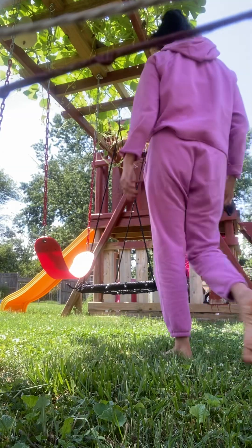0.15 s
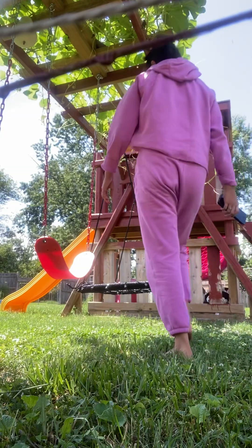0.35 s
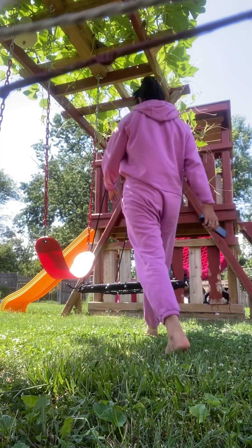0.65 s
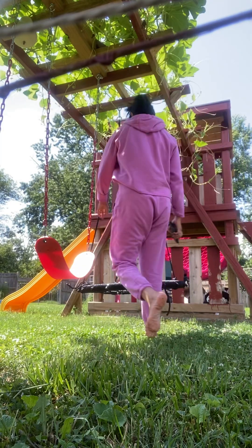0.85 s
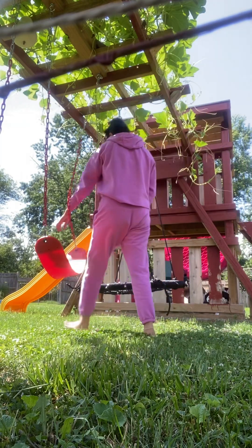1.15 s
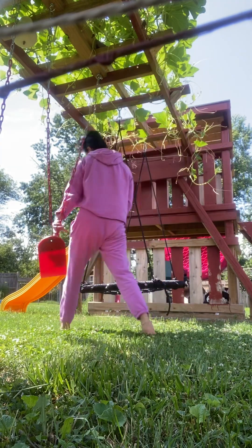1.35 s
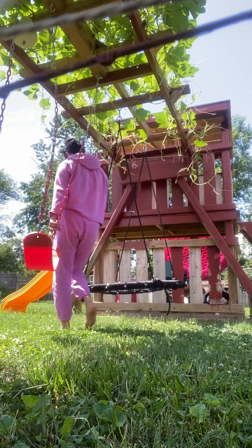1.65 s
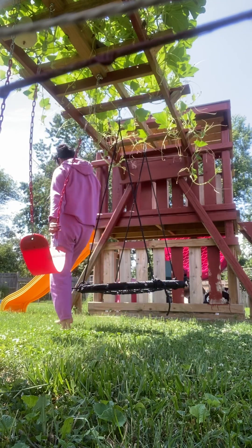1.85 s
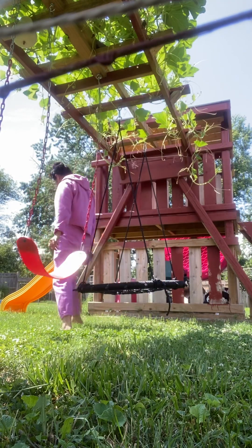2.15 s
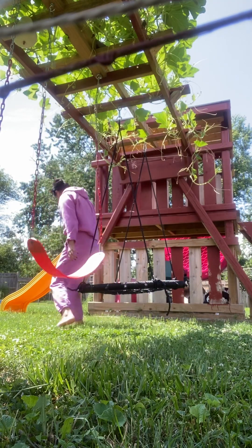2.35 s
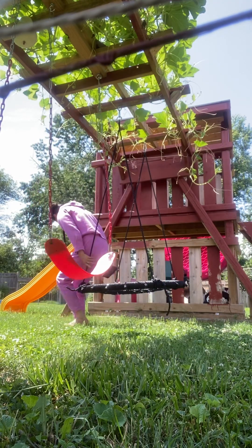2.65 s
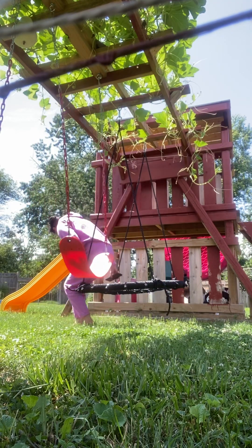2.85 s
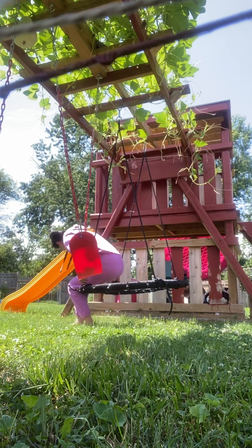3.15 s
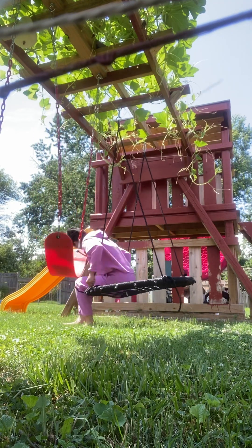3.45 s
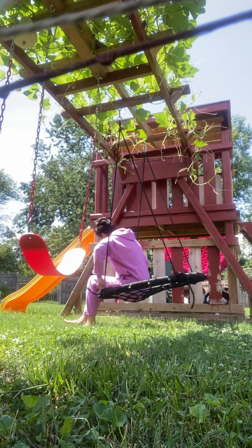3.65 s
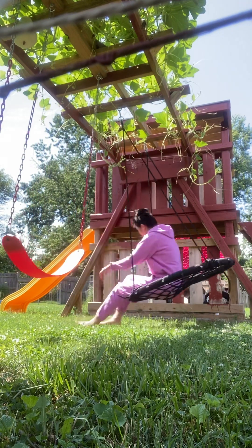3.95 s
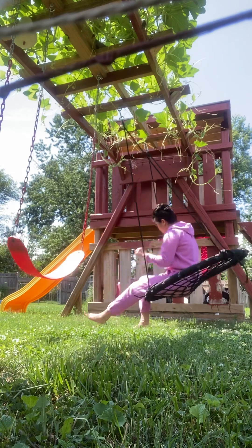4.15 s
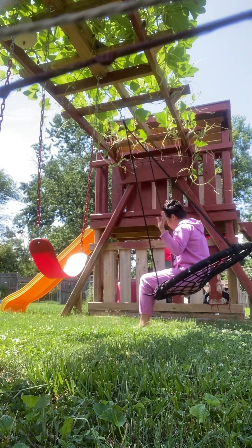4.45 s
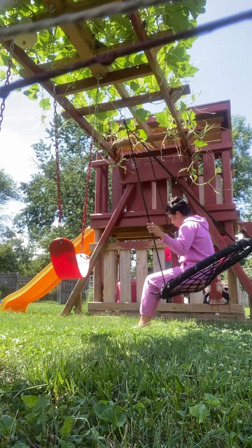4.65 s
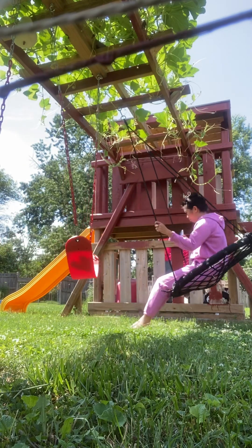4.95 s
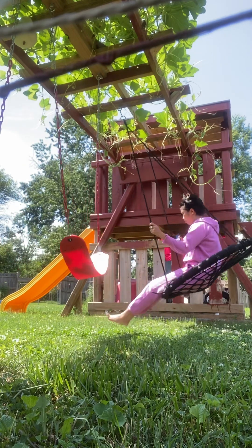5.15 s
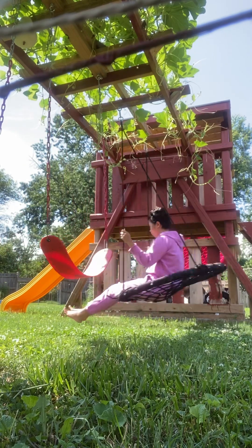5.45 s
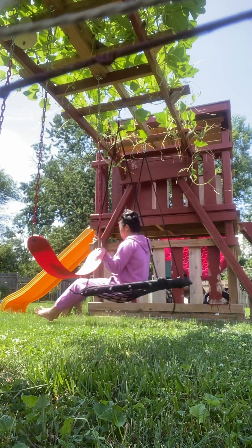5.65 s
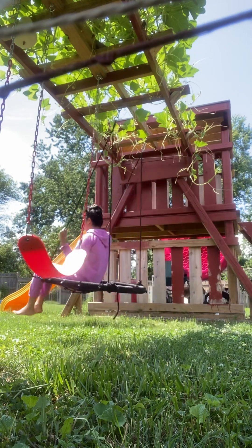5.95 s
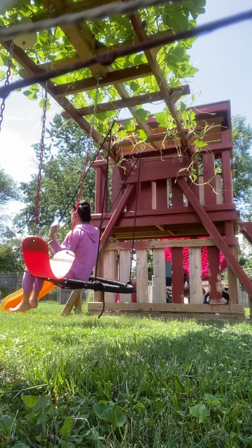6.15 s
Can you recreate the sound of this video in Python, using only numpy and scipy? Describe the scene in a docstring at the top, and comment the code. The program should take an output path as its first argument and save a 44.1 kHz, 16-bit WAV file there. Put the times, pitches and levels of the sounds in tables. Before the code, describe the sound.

In a backyard, swing chains tick and jingle against hollow wood, followed by sharp clacks and short grinding creaks as someone sits and swings.

```python
"""Backyard swing set

A timber swing set, heard in stereo from a camera resting on a neighbouring swing. Distant rumble and a swelling
hiss of insects are filtered noise. Steel chains, struck as damped modes, clink and bump the dull, boomy frame as
someone brushes past one swing and sits down on another; then the loaded hangers clack and grind, as slips excite
resonances.
"""
import sys
import numpy as np
from scipy import signal
from scipy.fft import rfft, irfft, next_fast_len
from scipy.io import wavfile
from scipy.ndimage import map_coordinates

SR = 44100
rng = np.random.default_rng(int(sys.argv[2]) if len(sys.argv) > 2 else 0)


def transcribe(u):
    """Save the signal u as a 16-bit wav file named by the first command-line argument.

    u: samples, shape (n,) or (channels, n), limited to [-1, 1]; the rate is SR.
    q: integer samples, one column per channel.
    """
    v = np.clip(np.atleast_2d(u).T, -1, 1)
    q = np.round(v * 32767).astype(np.int16)
    wavfile.write(sys.argv[1], SR, q)


N = 278226
T = np.arange(N) / SR

# Rumble across the yard. Each row: frequency in Hz, relative density in dB per Hz.
YARD_SPECTRUM = [(20, -10), (35, -6), (55, 4), (80, -4.5), (115, 0), (200, -11.5), (420, -19), (750, -25.5),
                 (1100, -28.5), (2200, -36.5), (3000, -40), (6300, -42.5), (8200, -53), (10000, -42.5),
                 (13000, -66)]
# Insects. Each row: frequency in Hz, relative density in dB per Hz.
INSECT_SPECTRUM = [(1500, -96), (2600, -8.5), (3500, -3.5), (4500, -6), (5100, 3), (6400, 5), (6900, 1),
                   (7500, -10.5), (9000, -18), (12000, -59)]
# Left-right likeness of the hisses. Each row: frequency in Hz, correlation from 0 to 1.
STEREO_LIKENESS = [(60, .999), (300, 1), (650, 0.76), (1000, 0.033), (2200, 0.43), (3400, 0.97),
                   (4100, 0.4), (5500, 1), (6800, 0.97), (10000, 1)]
# Chains jostling the seat. Each row: time in seconds, relative level in dB.
SWAY = [(0.8, -51), (1.17, -37.5), (1.57, -33.5), (1.81, -23.5), (1.98, -30), (3.17, -36), (3.34, -59),
        (3.6, -39)]
# Modes of the frame and seat. Each row: frequency in Hz, relative level in dB, T60 in seconds.
FRAME_MODES = [(52.2, -11, 0.58), (71, 1, 0.11), (112.4, -0.5, 0.19), (157.1, 1.5, 0.15),
               (227.4, -3, 0.099), (300.8, 0, 0.15), (324.5, -3.5, 0.15), (464, -27, 0.088),
               (590, -18, 0.045)]
# Bumps against the frame. Each row: time in seconds, relative level in dB, hardness in dB per octave.
FRAME_BUMPS = [(0.977, -24.5, -1.5), (1.127, -13, 1.5), (1.247, -24.5, -7.5), (1.316, -23.5, -1),
               (1.362, -22, -10), (1.512, -21, -8.5), (1.663, -16, -0.5), (1.774, -24.5, 14.5),
               (1.921, -30, -6), (1.964, -19, 1), (2.192, -21, -5), (2.246, -20.5, -5), (2.296, -22, 2.5),
               (2.602, -32, 17.5), (2.689, -35, 12.5), (2.756, -31.5, 14), (2.967, -23, -1),
               (3.106, -21, 4), (3.153, -22.5, 13.5), (3.614, -24.5, -6.5), (3.683, -30.5, -18),
               (3.736, -28, 5), (4.168, -31.5, 12.5), (4.256, -14.5, 0.5), (4.419, -33, 12.5),
               (4.361, -26, -12.5), (4.498, -23.5, 0.5), (4.636, -19.5, -9.5), (4.66, -23, -5),
               (4.799, -21, -2.5), (4.879, -19.5, -6), (4.922, -20, -1.5), (5.573, -16, -8),
               (5.601, -16, -7), (5.733, -16, 4), (5.941, -10.5, 3), (5.967, -16.5, -13.5),
               (6.269, -21.5, 0.5)]
# Chain links striking. Each row: time in seconds, relative level in dB, kind of link ("long" or "short").
LINK_STRIKES = [(1.077, -47.5, "long"), (1.32, -49, "long"), (1.555, -52, "long"), (1.617, -27.5, "long"),
                (1.624, -37, "long"), (1.646, -35.5, "long"), (1.659, -41, "long"),
                (1.7637, -29.5, "short"), (1.78, -39.5, "short"), (1.819, -43, "long"),
                (1.908, -40, "short"), (2.045, -47.5, "long"), (2.132, -50, "long"), (2.152, -34, "long"),
                (2.232, -34, "short"), (2.244, -41, "long"), (2.263, -37, "long"), (2.277, -45, "short"),
                (2.286, -41, "long"), (2.38, -38.5, "long"), (2.395, -42, "long"), (2.46, -53, "long"),
                (2.494, -51, "long"), (2.597, -37.5, "short"), (2.636, -59, "short"),
                (2.716, -39.5, "short"), (2.727, -37, "short"), (2.746, -33, "short"),
                (2.972, -49, "short"), (3.095, -46, "long"), (3.112, -40, "long"), (3.148, -35, "short"),
                (3.23, -39.5, "long"), (3.24, -36.5, "long"), (3.339, -43.5, "long"), (3.557, -45, "short"),
                (3.611, -34.5, "short"), (4.067, -35.5, "short"), (4.231, -39.5, "long"),
                (4.252, -55, "long"), (4.817, -50, "long"), (4.863, -34, "long"), (5.603, -54, "long"),
                (5.659, -48, "short"), (6.253, -42, "short")]
# Modes of the two kinds of link. Each row: frequency in Hz, relative level in dB, T60 in seconds.
LONG_LINK_MODES = [(11480, 0, .025), (11670, 0, .15), (12400, 3, .02), (12580, 3, .08), (13520, -5, .06)]
SHORT_LINK_MODES = [(11900, 0, .11), (12880, -2, .07), (13200, 1, .012), (13880, -3, .06),
                    (15000, -8, .015)]
# Dull clatter of the links. Each row: frequency in Hz, relative density in dB per Hz.
CLATTER_SPECTRUM = [(400, 18.5), (900, 14), (1600, 12), (2300, 12), (3200, -44), (6500, -19), (9000, 9),
                    (12000, -21)]
# A slack chain snaps taut. Each row: time in seconds, relative level of the bright tick in dB, of the knock in dB.
CHAIN_SNAPS = [(1.617, -46, -60), (1.624, -48, -49), (1.656, -44, -51), (1.766, -46, -52),
               (1.776, -41, -36.5), (1.906, -47, -43), (2.153, -52, -47), (2.231, -47, -46),
               (2.255, -49, -43), (2.29, -46, -53), (2.601, -38, -38.5), (2.745, -41.5, -56),
               (2.974, -48, -43), (3.096, -49, -40), (3.146, -41, -34), (3.24, -45, -45), (3.611, -44, -46),
               (4.866, -51, -41)]
# Colour of a snap's tick and knock. Each row: frequency in Hz, gain in dB.
TICK_COLOUR = [(1500, -30), (3300, -6), (4000, 7), (5000, -4), (6500, 4), (8000, -17), (9500, 1),
               (12000, 2), (13500, -7), (15000, -26)]
KNOCK_COLOUR = [(300, 8), (700, 8.5), (1100, -13.5), (1600, 2), (2300, 1.5), (3200, -9), (6000, -46)]
# Brief squeaks of the joints. Each row: time in seconds, relative level in dB, pitch in Hz.
JOINT_SQUEAKS = [(1.658, -42, 1590), (1.795, -35.5, 610), (1.922, -39, 591), (2.259, -33, 567),
                 (3.586, -49.5, 2450), (3.925, -37, 870)]
# The hanger slips under load, often several times in a row.
# Each row: time in seconds, relative level in dB, then crack, hook and bracket in dB relative to it.
HANGER_SLIPS = [(4.2419, -16.5, -16, -31, -30), (4.2448, -12.5, -14.5, -19, -28),
                (4.2528, -18.5, -15, -27, -28), (4.304, -27, -20, -15, -24), (4.397, -36, -6, -30, -25),
                (4.755, -37, -28, -34, -33), (4.765, -31, -18, -30, -28), (4.785, -40, -14, -18, -24),
                (4.806, -26, -8, -24, -24), (5.7154, -21, -5.5, -24, -13), (5.7191, -18, -4, -28, 0.5),
                (5.724, -23, -12, -28, -17), (5.735, -22.5, -9, -32, -16), (5.9291, -18, -7, -24, -13),
                (5.931, -14.5, -6.5, -14.5, -7), (5.9383, -10, -21, -25, -32),
                (5.9442, -13.5, -26, -34, -30), (6.253, -24, -7, -29, -12)]
# The hanger on its beam. Each row: frequency in Hz, width in Hz before any added damping, relative level in dB.
HANGER_MODES = [(307, 34.7, 2.5), (397, 44.5, 1), (462.2, 18, 4.5), (607, 12.4, 1), (676, 6.7, -60),
                (808, 11, -32), (1086, 28, -33), (1280, 28, -40.5), (1387, 22, -40), (1590, 70, -25),
                (2040, 170, -39), (2500, 39, -44)]
# The hanger's steel bracket. Each row: frequency in Hz, width in Hz, relative level in dB.
BRACKET_MODES = [(2220, 160, -3.5), (2890, 150, 1.5), (4060, 420, 1), (5660, 96, -5), (6100, 120, -9.5)]
# Colour of a slip's crack. Each row: frequency in Hz, gain in dB.
CRACK_COLOUR = [(200, 15), (600, 20.5), (1400, 14.5), (1900, 4), (2700, -3), (3400, -2), (6000, -5),
                (8000, -9), (14000, -34)]
# The hanger grinds. Each row: start in seconds, length in seconds, relative level in dB, swell in dB per second,
# slip rate at the start in Hz, slip rate at the end in Hz, rasp in dB relative to the groan.
HANGER_CREAKS = [(4.259, 0.051, -30.5, -30, 401.2, 457, -19), (4.262, 0.046, -33, -120, 603.6, 605, -10),
                 (4.34, 0.037, -33.5, -60, 451, 423, -20), (4.404, 0.094, -39.5, -10, 407.6, 443, -16),
                 (4.55, 0.024, -37.5, -40, 450.4, 450, -16), (4.616, 0.014, -33, 200, 422, 475, -28),
                 (4.754, 0.041, -28, -88, 401, 566, -17.5), (4.875, 0.068, -41, -3, 596.4, 449, -25),
                 (5.965, 0.14, -36.5, 8, 590, 602, -7), (5.987, 0.028, -26.5, -1, 311.8, 324, -27),
                 (6.041, 0.041, -28, 5, 440.3, 387, -23), (6.111, 0.0303, -28.5, 170, 350.4, 407, -17.5),
                 (6.146, 0.1, -29, -17, 463, 427, -22), (6.159, 0.072, -28.5, -21, 599.2, 602.4, -11),
                 (6.26, 0.035, -28.5, -60, 338.4, 296, -24)]
# Phase between the microphones, for the chains and yard, then for the top beam.
# Each row: frequency in Hz, radians by which the left leads.
CHAIN_AND_YARD_PHASE = [(20, 0), (250, -.3), (800, -1.3), (1500, -.5), (2100, -3.4), (2500, -4),
                        (3500, -3.15), (5400, -2.1), (6400, -.2), (8200, -.3), (9000, -1.2), (11700, -2.2),
                        (12700, -2.5), (14800, -2.9)]
BEAM_PHASE = [(20, 0), (250, -.55), (750, -.8), (1400, .3), (2000, .7), (2450, 1.7), (3700, 3.1),
              (5400, 4.1), (6400, 6.2), (8200, 6), (11700, 3.85)]

INSECTS_FIRST_DB, INSECTS_FULL_DB = -65.5, -50  # the chorus swells from one level towards the other
INSECTS_MIDWAY_S, INSECTS_SWELL_S = 3.32, 1.44
SOFT_TUG_HZ = 3450  # the jostling tugs are soft: their treble falls away from here
STIR_PER_S, STIR_DB = 17, -36  # faint touches of the swaying links, relative to the sway
TUG_DB, TUG_HARDNESS, TUG_DELAY_S = 7, 2, 0.0049  # each link strike tugs at the frame
BUMP_HZ, BUMP_FOCUS_DB = 149.7, 5.5  # a blow is strongest here, and this much weaker an octave away
SEATED_S, SEAT_HZ, SEATED_DB = 3.9, 156, -10.5  # from then on the sitter's weight muffles the seat's modes
# The next links clash briefly after a strike; T60 is a fade on top of their own decay
NEIGHBOUR_DB, NEIGHBOUR_LAG_S, NEIGHBOUR_DETUNE, NEIGHBOUR_T60_S = -8, 0.028, 0.0213, 0.052
SNAP_T60_S, KNOCK_T60_S, SNAP_GRAINS_PER_S = .035, 0.027, 1500
CLACK_DAMPING, CRACK_T60_S = 1.7, 0.044  # a hard slip widens the hanger's modes; life of its crack
CRACK_GRAINS_PER_S = 3000  # a crack is a spray of tiny slips
HOOK_HZ, HOOK_WIDTH_HZ = 2430, 75
HOOK_RISE_S, HOOK_T60_S = 0.0024, 0.054  # the steel hook takes up a slip and is soon damped by the load
HOOK_GRIND_DB = -33.5  # the hook also sings faintly under every creak
CREAK_ATTACK_S, CREAK_RELEASE_DB_PER_S = 0.0032, 418
SLIP_JITTER, CHATTER_DB = 0.163, -7  # uneven gaps between slips; micro-slips beside the regular ones
RASP_HZ, RASP_WIDTH_HZ = 739, 78  # each of two passes that shape the rasp of the rubbing faces
JUDDER_HZ, JUDDER_DB = 45.3, 2  # mean rate of the uneven surges, and their depth in the rasp
ECHO_DB, ECHO_T60_S = -10, 0.11  # scatter from the beams and the playhouse
TOP_HZ = 15272  # the camera's band limit


def amp(db):
    """Decibels to gain."""
    return 10 ** (np.asarray(db) / 20)


def unit(x):
    """Scale to rms 1."""
    return x / np.sqrt(np.mean(x ** 2) + 1e-20)


def along(points, hz):
    """Interpolate (Hz, value) points on a log frequency axis."""
    f, v = np.transpose(points)
    return np.interp(np.log(hz + 1), np.log(f + 1), v)


def swell(rows):
    """Gain per sample from (s, dB) rows, fading out beyond their ends."""
    s, db = np.transpose(rows)
    outside = np.maximum(s[0] - T, 0) + np.maximum(T - s[-1], 0)
    return amp(np.interp(T, s, db) - 600 * outside)


def wobble(rate):
    """A smooth random curve, rate knots a second."""
    knots = rng.standard_normal(int(N * rate / SR) + 4)
    return map_coordinates(knots, [T * rate])


def filtered(x, response):
    """Multiply the spectrum of x by a (possibly complex) response of frequency."""
    m = next_fast_len(x.shape[-1] + SR // 2)
    spectrum = rfft(x, m) * response(np.fft.rfftfreq(m, 1 / SR))
    return irfft(spectrum, m)[..., :x.shape[-1]]


def shaped(x, colour):
    """Colour x by (Hz, dB) points, keeping its power."""
    power = np.mean(x ** 2)
    return unit(filtered(x, lambda hz: amp(along(colour, hz)))) * np.sqrt(power)


def add(track, s, sound):
    """Mix a sound into a track at time s."""
    part = track[round(s * SR):][:len(sound)]
    part += sound[:len(part)]


def hiss(spectrum):
    """Stereo noise of rms 1; mid and side are mixed so that left-right likeness follows frequency."""
    turn = lambda hz: np.arccos(np.clip(along(STEREO_LIKENESS, hz), 0, 1)) / 2
    shape = lambda hz: amp(along(spectrum, hz)) * [np.cos(turn(hz)), np.sin(turn(hz))]
    mid, side = filtered(rng.standard_normal((2, N)), shape)
    return unit(np.array([mid + side, mid - side]))


def contacts(rate, scatter_db, size=N):
    """Irregular impulses of uneven strength and either sign."""
    hits = rng.random(size) < rate / SR
    return hits * amp(scatter_db * rng.standard_normal(size)) * rng.choice([-1, 1], size)


def grains(rate, size=N):
    """A dense spray of unevenly spaced impulses, rms 1."""
    count = int(size * rate / SR)
    at = ((np.arange(count) + rng.random(count)) * (size - 1) / count).astype(int)
    strength = amp(3 * rng.standard_normal(count)) * rng.choice([-1, 1], count)
    return unit(np.bincount(at, strength, size))


def resonate(x, modes):
    """Pass a force through parallel (Hz, width, dB) resonances of alternating sign."""
    def response(f):
        return sum((-1) ** k * amp(db) * 1j * f * w / (c * c - f * f + 1j * f * w)
                   for k, (c, w, db) in enumerate(modes))
    return filtered(x, response)


def ring(modes, t, detune, scatter_db):
    """Damped (Hz, dB, T60) modes, struck a little differently each time."""
    hz, db, t60 = np.transpose(modes)[:, :, None]
    pitch, size = rng.standard_normal((2, len(modes), 1))
    phase = 2 * np.pi * rng.random((len(modes), 1))
    decay = amp(db + scatter_db * size - 60 * t / t60)
    return np.sum(decay * np.sin(2 * np.pi * hz * (1 + detune * pitch) * t + phase), 0)


def link_modes(kind):
    """The modes of a long or short chain link."""
    return LONG_LINK_MODES if kind == "long" else SHORT_LINK_MODES


def yard():
    """Steady outdoor rumble with an uneven bass, a faint far hum, and insects that slowly grow louder."""
    air = amp(-35.0) * hiss(YARD_SPECTRUM)
    bass = filtered(air, lambda hz: 1 / (1 + (hz / 150) ** 4))
    rumble = air * amp(.6 * wobble(7)) + bass * (amp(1.5 * wobble(12)) - 1)
    hum = amp(-54.5) * unit(resonate(rng.standard_normal(N), [(407.0, 4.1, -3.5), (1050, 9.3, -15)]))
    joined = (1 + np.tanh((T - INSECTS_MIDWAY_S) / INSECTS_SWELL_S)) / 2
    chorus_db = INSECTS_FIRST_DB + (INSECTS_FULL_DB - INSECTS_FIRST_DB) * joined
    insects = amp(chorus_db + 1.06 * wobble(27)) * hiss(INSECT_SPECTRUM)
    return rumble + hum + insects


def jostle():
    """Many small tugs of the swaying chains keep the frame's resonances murmuring."""
    tilt = [(60, -19.5), (130, 12.5), (330, 1.5), (420, 4.0)]
    # a mode's width follows from its T60
    modes = [(hz, np.log(1000) / (np.pi * t60), db + along(tilt, hz)) for hz, db, t60 in FRAME_MODES]
    tugs = contacts(rate=200, scatter_db=2)
    murmur = filtered(resonate(tugs, modes), lambda hz: 1 / (1 + (hz / SOFT_TUG_HZ) ** 2))
    return amp(-3) * swell(SWAY) * unit(murmur)


def stir():
    """Swaying links touch lightly and keep their longest mode faintly ringing between the strikes."""
    hz, db, t60 = LONG_LINK_MODES[1]
    t = np.arange(SR // 4) / SR
    touches = contacts(rate=STIR_PER_S, scatter_db=3)
    ping = np.sin(2 * np.pi * hz * t) * amp(-60 * t / t60)
    tone = signal.fftconvolve(touches, ping)[:N]
    return amp(STIR_DB) * swell(SWAY) * unit(tone)


def bumps():
    """Bumps and chain tugs ring the frame; soft blows stir its lowest modes, hard ones its upper modes."""
    out, t = np.zeros(N), np.arange(SR // 2) / SR
    tugs = [(s + TUG_DELAY_S, db + TUG_DB, TUG_HARDNESS) for s, db, kind in LINK_STRIKES]
    hz, level, t60 = np.transpose(FRAME_MODES)
    octaves = np.clip(np.log2(hz / BUMP_HZ), -1.2, 1.1)
    for s, db, hardness in tugs + FRAME_BUMPS:
        muffled_db = SEATED_DB * (s > SEATED_S) * np.exp(-(np.log2(hz / SEAT_HZ) / 0.24) ** 2)
        blow_db = hardness * octaves - BUMP_FOCUS_DB * octaves ** 2
        modes = np.column_stack([hz, level + muffled_db + blow_db, t60])
        blow = ring(modes, t, detune=.025, scatter_db=1)
        onset = 1 - np.exp(-t / 0.0076)
        add(out, s - .003, amp(db + 1.0) * blow * onset)
    return out


def chains():
    """A link strikes its neighbour and chatters against it; each rings differently near the top of hearing."""
    links, chatter, t = np.zeros(N), np.zeros(N), np.arange(SR // 3) / SR
    for s, db, kind in LINK_STRIKES:
        settle = amp(db - 19.0) * (amp(-60 * t / 0.044) + amp(-8.5 - 60 * t / 0.34))
        force = settle * contacts(rate=800, scatter_db=3, size=len(t))
        force[0] = amp(db - 8)  # the first strike, ahead of the chatter
        add(links, s, signal.fftconvolve(force, ring(link_modes(kind), t, detune=.004, scatter_db=3.5)))
        add(chatter, s, settle)
    colour = [(6000, -2), (10500, -7.0), (11500, 1.5), (14000, -13.5), (15000, -8)]
    tone = filtered(links, lambda hz: amp(along(colour, hz)))
    return amp(1.5) * tone + amp(4.5) * chatter * hiss(CLATTER_SPECTRUM)


def neighbours():
    """A struck link knocks the next ones, held too tight to ring for long: each strike becomes a cluster."""
    out, t = np.zeros(N), np.arange(SR // 12) / SR
    for s, db, kind in LINK_STRIKES:
        for lag, size in zip(rng.random(4), rng.standard_normal(4)):
            clash = ring(link_modes(kind), t, detune=NEIGHBOUR_DETUNE, scatter_db=8.5)
            gain = amp(db + NEIGHBOUR_DB + 1.7 * size - 60 * t / NEIGHBOUR_T60_S)
            add(out, s + lag * NEIGHBOUR_LAG_S, gain * clash)
    colour = [(6000, -23), (11000, -11.0), (12000, -7.5), (13500, -13), (15000, -23)]
    return filtered(out, lambda hz: amp(along(colour, hz)))


def snaps():
    """A chain pulled taut gives a dry, gritty tick and a knock in its fittings, both decaying grain sprays."""
    (tick, knock), t = np.zeros((2, N)), np.arange(SR // 10) / SR
    for s, tick_db, knock_db in CHAIN_SNAPS:
        add(tick, s, amp(tick_db - 60 * t / SNAP_T60_S) * grains(SNAP_GRAINS_PER_S, size=len(t)))
        add(knock, s, amp(knock_db - 60 * t / KNOCK_T60_S) * grains(SNAP_GRAINS_PER_S, size=len(t)))
    return amp(-2) * shaped(tick, TICK_COLOUR) + amp(2.5) * shaped(knock, KNOCK_COLOUR)


def squeaks():
    """A joint sings roughly for a few hundredths of a second as it shifts."""
    out, t = np.zeros(N), np.arange(SR // 10) / SR
    middle = t[-1] / 2
    for s, db, hz in JOINT_SQUEAKS:
        drift = np.cumsum(rng.standard_normal(len(t))) * .11
        envelope = np.exp(-((t - middle) / 0.01) ** 2)
        add(out, s - middle, amp(db - 1.5) * envelope * np.sin(2 * np.pi * hz * t + drift))
    return out


def hook_tone():
    """The hook's rough ring: rubbing keeps jolting its phase."""
    drift = np.cumsum(rng.standard_normal(N)) * np.sqrt(2 * np.pi * HOOK_WIDTH_HZ / SR)
    return np.sin(2 * np.pi * HOOK_HZ * T + drift)


def clacks():
    """Each slip kicks the hanger's resonances, rings its hook, rattles its bracket and sprays a grainy crack."""
    (kicks, spray, rattle, hook), t = np.zeros((4, N)), np.arange(SR // 4) / SR
    lead_in = .001  # seconds
    burst = (1 - np.exp(-(t / lead_in) ** 2)) * amp(-60 * t / CRACK_T60_S)
    hook_rise = 1 - np.exp(-(t / HOOK_RISE_S) ** 2)
    for s, db, crack_db, hook_db, bracket_db in HANGER_SLIPS:
        add(kicks, s, amp([db + 36.5]))  # a single-sample force
        add(hook, s, amp(db + hook_db - 60 * t / HOOK_T60_S) * hook_rise)
        add(spray, s - lead_in, amp(db + crack_db) * burst)
        add(rattle, s - lead_in, amp(db + bracket_db) * burst)
    body = resonate(kicks, [(hz, width * CLACK_DAMPING, db) for hz, width, db in HANGER_MODES])
    bracket = resonate(rattle * grains(CRACK_GRAINS_PER_S), BRACKET_MODES)
    crack = shaped(spray * grains(CRACK_GRAINS_PER_S), CRACK_COLOUR)
    return body + hook * hook_tone() + amp(-1) * bracket + amp(-4.5) * crack


def stroke(t, length, db, swell_db_per_s):
    """Gain of one creak: it catches quickly, swells or sags while the swing moves, and lets go."""
    release_db = CREAK_RELEASE_DB_PER_S * np.maximum(t - length, 0)
    held_db = db + swell_db_per_s * np.clip(t, 0, length) - release_db
    return amp(held_db) * np.clip(1 + t / CREAK_ATTACK_S, 0, 1)


def grind():
    """The stick-slip rate glides across the hanger's resonances; the faces rasp in surges and shake the frame."""
    (groan, rasp, pressure), t = np.zeros((3, N)), np.arange(-SR // 20, SR // 4) / SR
    face = [(RASP_HZ, RASP_WIDTH_HZ, 0)]
    tilt = [(190, -19), (295, 5.5), (600, 4.5), (1600, 7.5), (2500, 6), (3300, 17.0), (9000, -20)]
    colour = lambda hz: amp(along(tilt, hz))
    for start, length, db, swell_db_per_s, first_hz, last_hz, rasp_db in HANGER_CREAKS:
        gap, size = rng.standard_normal((2, 400))
        cycles = np.cumsum(np.interp(t, [0, length], [first_hz, last_hz])) / SR
        # a slip falls about once a cycle, unevenly
        slip_at = np.searchsorted(cycles, np.cumsum(np.exp(SLIP_JITTER * gap)))
        slips = np.bincount(slip_at, amp(1.2 * size), len(t))[:len(t)]
        slips = unit(slips) + amp(CHATTER_DB) * grains(CRACK_GRAINS_PER_S, size=len(t))
        gain = stroke(t, length, db, swell_db_per_s)
        # apply the gain and give every creak the energy of its gain curve
        pressed = lambda x: x * gain * np.linalg.norm(gain) / np.linalg.norm(x * gain)
        add(groan, start + t[0], pressed(filtered(resonate(slips, HANGER_MODES), colour)))
        add(rasp, start + t[0], amp(rasp_db) * pressed(resonate(resonate(slips, face), face)))
        add(pressure, start + t[0], gain)
    surge = np.sin(2 * np.pi * JUDDER_HZ * T + 1.5 * wobble(25))
    rubbing = groan * amp(1.5 * surge) + rasp * amp(JUDDER_DB * surge)
    jolts = contacts(rate=410, scatter_db=2.5)
    shudder = unit(resonate(jolts, [(49.6, 15, -9), (100.0, 19.0, 2.5), (230, 31.0, 0.0)]))
    singing = amp(HOOK_GRIND_DB) * pressure * hook_tone()
    return singing + amp(-1.5) * rubbing + amp(-26.0) * np.sqrt(pressure) * shudder


def echoes(x):
    """Nearby timbers scatter a brief tail, different on each side; the bass passes around them."""
    t = np.arange(SR // 5) / SR
    tail = rng.standard_normal((2, len(t))) * amp(-60 * t / ECHO_T60_S)
    wet = signal.fftconvolve(x, tail / np.linalg.norm(tail[0]), axes=1)[:, :N]
    wet = filtered(wet, lambda hz: hz ** 2 / (hz ** 2 + 350 ** 2))
    colour = [(250, -22), (900, 11), (2500, 0), (11000, -2.0)]
    return amp(ECHO_DB) * filtered(wet, lambda hz: amp(along(colour, hz)))


def scene():
    """The frame's low ring leans to the left; the microphone pair turns the phase of all direct sound."""
    tilt = [(50, 0.31), (450, 2.2), (1100, 0.63)]  # left over right: Hz, dB
    lean = lambda hz: amp(along(tilt, hz) * np.array([[.5], [-.5]]))
    pair = lambda phases: lambda hz: np.exp(.5j * along(phases, hz) * np.array([[1], [-1]]))
    background = yard()
    structure = jostle() + bumps() + squeaks() + clacks() + grind()
    links = stir() + chains() + neighbours() + snaps()  # stereo, from the clatter
    overhead = filtered(filtered(structure, lean), pair(BEAM_PHASE))
    beside = filtered(links + background, pair(CHAIN_AND_YARD_PHASE))
    return overhead + beside + echoes(structure + links)


def record(dry):
    """The camera weakens the deepest bass and drops everything above its band limit."""
    bass = [(15, -10), (28, -5.0), (40, 0.5)]
    return filtered(dry, lambda hz: (hz < TOP_HZ) * amp(along(bass, hz)))


dry = scene()
out = record(dry)
transcribe(out)
```